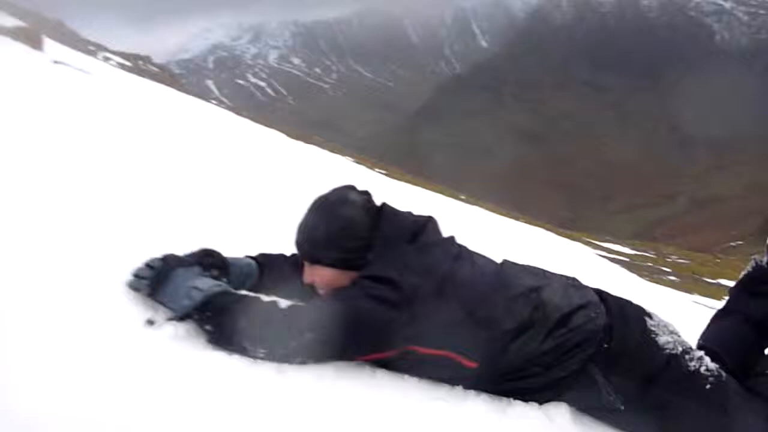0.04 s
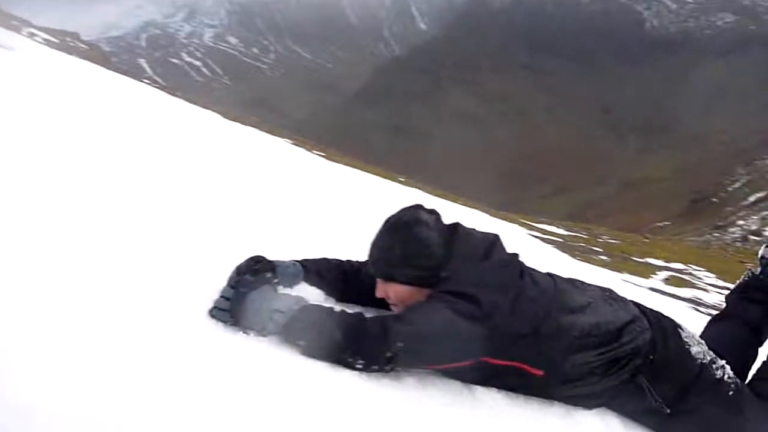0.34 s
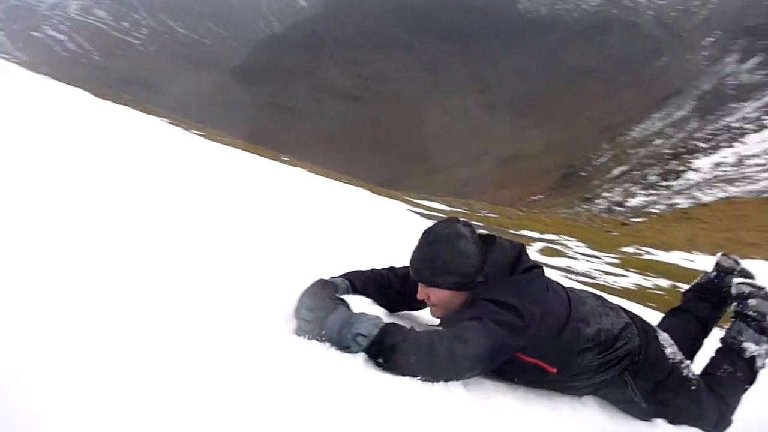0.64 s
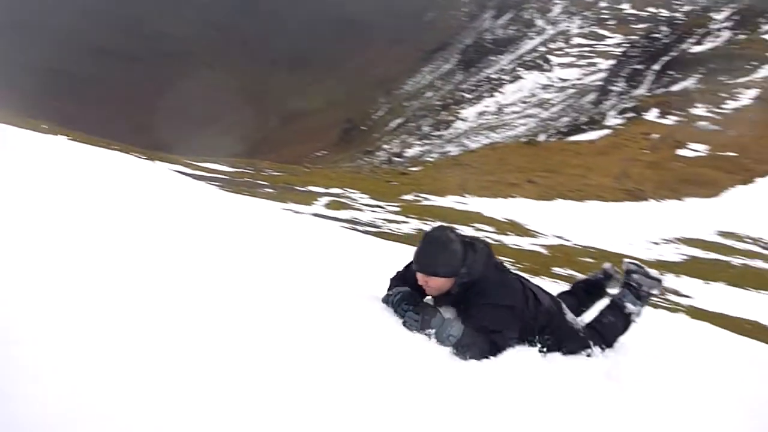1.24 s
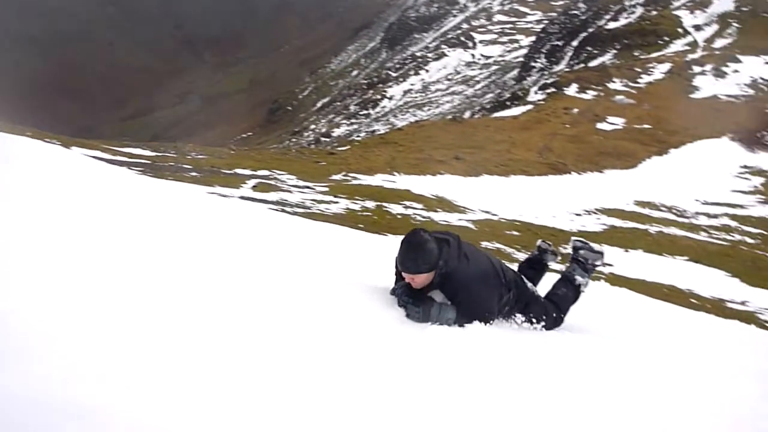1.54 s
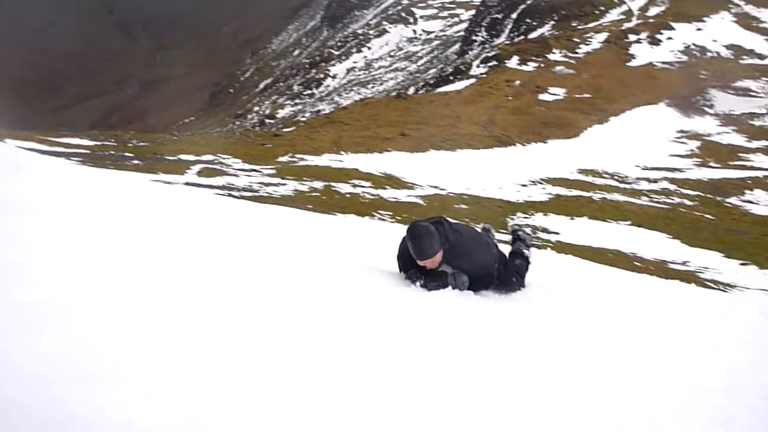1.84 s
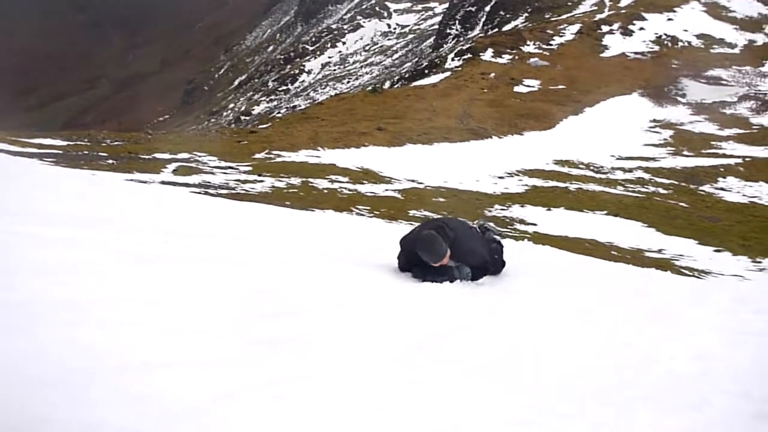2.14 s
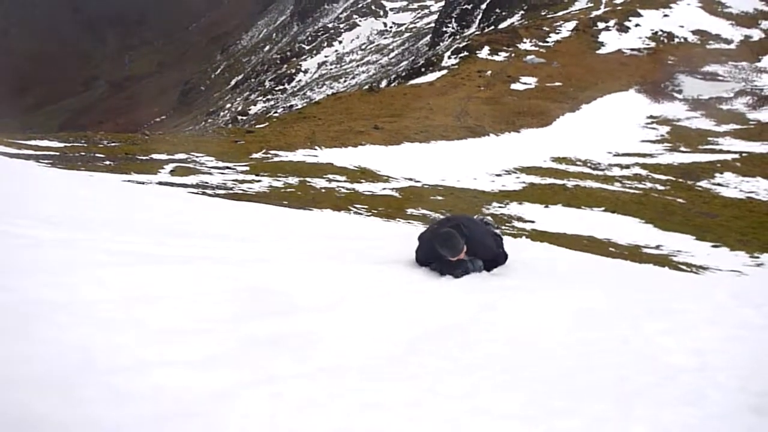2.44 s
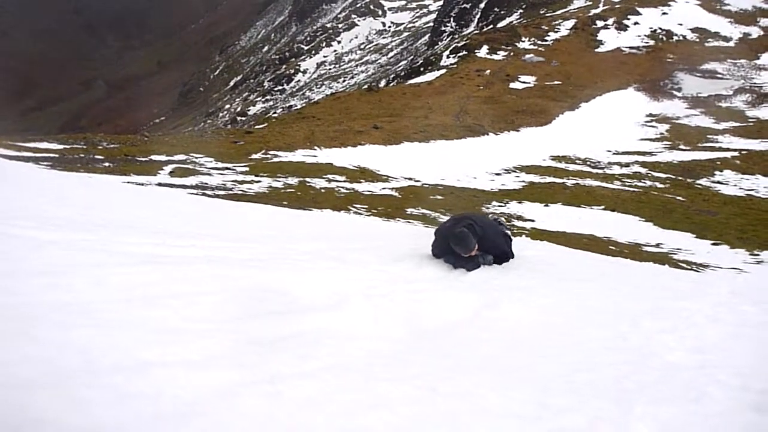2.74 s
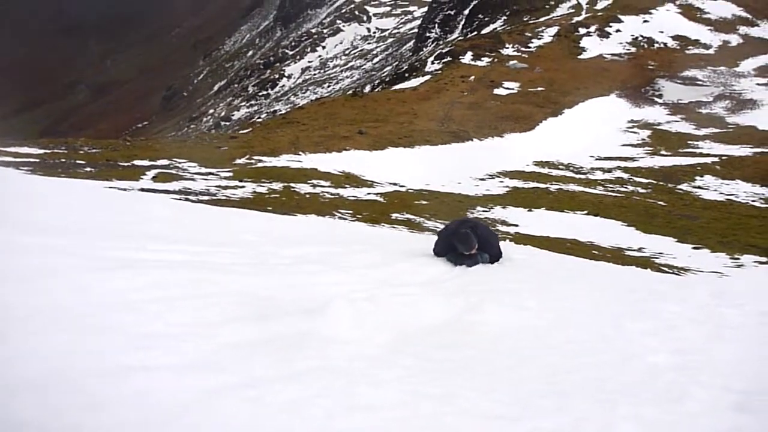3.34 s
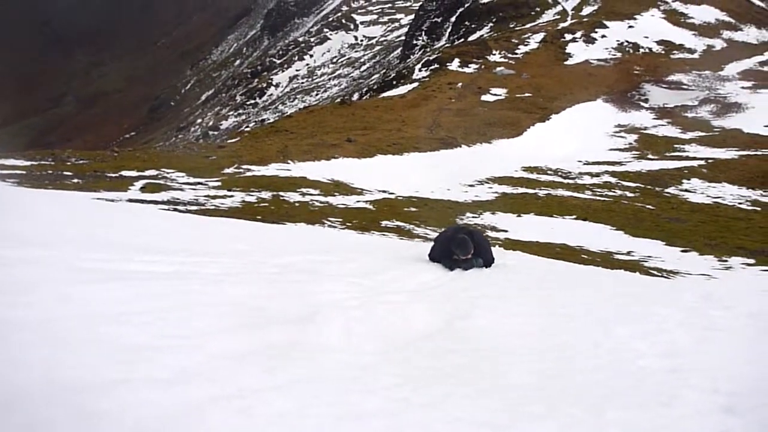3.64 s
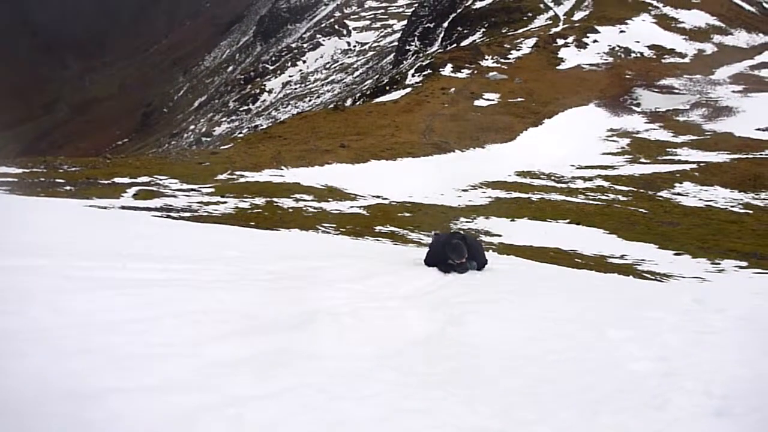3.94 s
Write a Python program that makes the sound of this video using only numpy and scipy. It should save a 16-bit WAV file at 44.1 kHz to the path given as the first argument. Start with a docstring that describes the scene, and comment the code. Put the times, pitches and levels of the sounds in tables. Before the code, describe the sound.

A body slides and scrapes over wet snow, fading away into steady mountain wind.

```python
"""A person slides belly-down over wet snow, passing close by and away downhill.
Sliding friction makes broadband noise: the body rubs, the jacket scrapes and swishes, and crystals
hiss on the cloth and fracture in tiny clicks. As the slide recedes, an even rush of mountain wind
remains. Near the end a camera's lens motor whines faintly. The small microphone is mono, with weak treble."""
import sys
import numpy as np
from scipy import signal
from scipy.fft import rfft, irfft
from scipy.io import wavfile
from scipy.ndimage import uniform_filter1d

SR = 44100
rng = np.random.default_rng(int(sys.argv[2]) if len(sys.argv) > 2 else 0)


def inscribe(sig):
    """Save sig as 16-bit PCM at rate SR to the path in sys.argv[1].

    A 1-D sig is mono; a 2-D sig holds one channel per row.
    Samples are clipped to [-1, 1] before scaling.
    """
    pcm = np.round(np.clip(np.atleast_2d(sig).T, -1, 1) * 32767)
    wavfile.write(sys.argv[1], SR, pcm.astype(np.int16))


N = 176400
T = np.arange(N) / SR
HZ = np.fft.rfftfreq(N, 1 / SR)

# Course of the slide: time_s, rub_db, scrape_db, hiss_db
SLIDE_LEVELS = [(.14, -45.5, -43, -46.5), (.3, -45, -42, -46.5), (.55, -45, -39.5, -43),
                (.8, -46.5, -41, -42), (.93, -44.5, -40, -41.5), (1.03, -48, -42, -42),
                (1.29, -43.5, -41, -43.5), (1.35, -47, -46, -45), (1.395, -50, -45, -49),
                (1.52, -55, -47, -50), (1.67, -50.7, -51, -48), (1.87, -59, -51, -53),
                (2.13, -55, -54.5, -54.5), (2.21, -56, -55, -56), (2.26, -70, -58, -57),
                (2.7, -66, -57.5, -57.5), (3.3, -61, -67, -58.5), (3.8, -76, -80, -66),
                (4.0, -70, -64, -71)]
# Body weight rubbing over packed snow: frequency_hz, level_db
RUB_SPECTRUM = [(40, -49), (110, -31), (180, -25.5), (280, -8.5), (480, -7), (700, -3.5), (900, 1),
                (1150, -4.5), (1450, -2.5), (2200, -11.5), (5000, -45)]
# Jacket ploughing the snow: frequency_hz, level_db
SCRAPE_SPECTRUM = [(200, -41), (1100, -24), (1450, -8), (1800, -6.5), (2130, -3), (2450, -3.5), (2950, -2),
                   (3220, -3), (3600, -1.5), (4200, -9.5), (6000, -10.5), (9000, -30), (15000, -29)]
# Crystals brushing the cloth: frequency_hz, level_db
HISS_SPECTRUM = [(100, -43), (1500, -18), (3500, -3), (4400, -1), (5150, 2), (5850, -3.5), (6400, -3.5),
                 (6950, -5), (8900, -13.5), (10300, -6.5), (11500, -12.5), (12800, -8), (13600, -10),
                 (15000, -30)]
# Wind over the valley: frequency_hz, level_db
WIND_SPECTRUM = [(25, -29), (60, -29.5), (100, -23), (180, -10), (280, -2), (430, 1.25), (620, 2),
                 (880, -1), (1300, -3), (1950, -7), (3200, -10), (3900, -13), (5300, -12.5), (6900, -19),
                 (9000, -17), (14000, -25.5)]
# Cloth dragging and catching: middle_s, half_length_s, centre_hz, half_width_hz, level_db
CLOTH_CATCHES = [(.55, 0.031, 3600, 170, -43.5), (0.657, 0.36, 2940, 130, -47.5),
                 (.6, 0.25, 6360, 230, -53.5), (0.886, 0.044, 5040, 250, -47),
                 (1.33, 0.024, 3470, 110, -47), (1.476, 0.044, 3990, 190, -47.3),
                 (1.56, 0.09, 3600, 320, -53), (2.208, 0.015, 4900, 900, -54),
                 (3.083, .025, 5550, 1100, -58), (3.347, 0.02, 5130, 1500, -53)]
# Moves of the lens motor: start_s, end_s, pitch_hz, step_rate_hz, level_db
MOTOR_MOVES = [(3.278, 3.432, 11859, 218, -61), (3.442, 3.605, 11789, 183, -62),
               (3.612, 3.793, 11789, 183, -62)]
# Resonances of the lens barrel: frequency_hz, gain_db
BARREL_RESPONSE = [(8500, -60), (9590, -20), (9680, -1), (9770, -16), (11200, -20), (11800, 1), (12100, -6),
                   (12400, -5), (12900, -20), (13550, -13), (13930, -3), (14300, -25)]
# Response of the small microphone: frequency_hz, gain_db
MIC_RESPONSE = [(6800, 0), (7400, -5.5), (7780, -16.5), (7950, -30), (8130, -15), (8500, -10.5), (9300, -9),
                (10300, -7.5), (11200, -6), (12200, -3.5), (13700, -4.5), (14600, -10), (15400, -8)]


def amp(db):
    """Amplitude grows tenfold for every 20 dB."""
    return 10 ** (np.asarray(db) / 20)


def unit(x):
    """Normalisation to an rms of 1."""
    return x / np.sqrt(np.mean(x ** 2) + 1e-20)


def colour(x, response):
    """Linear filtering: the spectrum is multiplied by a response interpolated over log frequency."""
    hz, db = np.transpose(response)
    gain = amp(np.interp(np.log(HZ + 1), np.log(hz), db))
    return irfft(rfft(x) * gain, N)


def wander(rate_hz):
    """Low-pass filtered noise gives a slow random fluctuation of rms 1."""
    low_pass = np.exp(-(HZ / rate_hz) ** 2) * (HZ > 0)
    return unit(irfft(rfft(rng.standard_normal(N)) * low_pass, N))


def patchy_noise(patch_db, bins=8, frames=22):
    """Random modulation makes the level of white noise drift in patches of frequency and time."""
    spectra = signal.stft(rng.standard_normal(N), nperseg=1024, noverlap=768)[2]
    patches = uniform_filter1d(rng.standard_normal(spectra.shape), bins, axis=0)
    patches = unit(uniform_filter1d(patches, frames, axis=1))
    return unit(signal.istft(spectra * amp(patch_db * patches), nperseg=1024, noverlap=768)[1][:N])


def noise_burst(middle_s, half_length_s, centre_hz, half_width_hz, level_db):
    """Gaussian windows confine noise in both frequency and time."""
    band = np.exp(-.5 * ((HZ - centre_hz) / half_width_hz) ** 2)
    envelope = np.exp(-.5 * ((T - middle_s) / half_length_s) ** 2)
    return unit(irfft(rfft(rng.standard_normal(N)) * band, N)) * amp(level_db) * envelope


def friction(spectrum, click_share, patch_db, clicks_per_s=3500):
    """Friction gives continuous noise; brittle fracture of crystals adds impulses, a few of them large."""
    size_db = 2 * np.minimum(rng.exponential(1, N), 5.7)
    polarity = np.sign(rng.standard_normal(N))
    clicks = unit(amp(size_db) * polarity * (rng.random(N) < clicks_per_s / SR))
    contact = np.sqrt(click_share) * clicks + np.sqrt(1 - click_share) * patchy_noise(patch_db)
    return unit(colour(contact, spectrum))


def slide(judder_db=0.44, judder_hz=35):
    """Sliding friction in three bands, amplitude-modulated together by small bumps in the snow."""
    time_s, rub_db, scrape_db, hiss_db = np.transpose(SLIDE_LEVELS)
    rub = friction(RUB_SPECTRUM, click_share=0.26, patch_db=0.25)
    rub *= amp(np.interp(T, time_s, rub_db))
    scrape = friction(SCRAPE_SPECTRUM, click_share=0.46, patch_db=0.05)
    scrape *= amp(np.interp(T, time_s, scrape_db))
    hiss = friction(HISS_SPECTRUM, click_share=0.36, patch_db=1.5)
    hiss *= amp(np.interp(T, time_s, hiss_db))
    return (rub + scrape + hiss) * amp(judder_db * wander(judder_hz))


def wind(level_db=-47, swell_db=0.38, swell_hz=5):
    """Turbulence in distant air makes an even broadband rush with slight swells."""
    rush = unit(colour(rng.standard_normal(N), WIND_SPECTRUM))
    return rush * amp(level_db + swell_db * wander(swell_hz))


def body_bump():
    """A soft impact, here the body on snow, holds its energy at low frequencies."""
    return noise_burst(middle_s=0.17, half_length_s=0.023, centre_hz=140, half_width_hz=35, level_db=-64)


def cloth_swishes():
    """Friction swells and fades as the cloth catches, each time in its own band."""
    return sum(noise_burst(*catch) for catch in CLOTH_CATCHES)


def lens_motor(ramp_s=0.0063, waver_hz=5, waver_rate_hz=30, fuzz_share=.15, sidebands=12):
    """A whine with sidebands spaced by the step rate, plus gear noise, drives the barrel's resonances."""
    moves = np.zeros(N)
    for start_s, end_s, pitch_hz, step_rate_hz, level_db in MOTOR_MOVES:
        cycles = np.cumsum(pitch_hz + waver_hz * wander(waver_rate_hz)) / SR
        tones = sum(np.cos(2 * np.pi * (cycles + k * step_rate_hz * T + rng.random()))
                    for k in range(-sidebands, sidebands + 1))
        whine = np.sqrt(1 - fuzz_share) * unit(colour(tones, BARREL_RESPONSE))
        gear_fuzz = np.sqrt(fuzz_share) * unit(colour(rng.standard_normal(N), BARREL_RESPONSE))
        envelope = np.clip(np.minimum(T - start_s, end_s - T) / ramp_s, 0, 1)
        moves += (whine + gear_fuzz) * amp(level_db) * envelope
    return moves


def scene():
    """Superposition: the sources add to one signal, alike in both channels."""
    mono = slide() + wind() + body_bump() + cloth_swishes() + lens_motor()
    return np.array([mono, mono])


def record(dry, start_s=.141, cutoff_hz=15700):
    """The microphone's frequency response colours the sound, which cuts in abruptly and is band-limited."""
    heard = np.array([colour(channel, MIC_RESPONSE) for channel in dry]) * (T >= start_s)
    low_pass = signal.firwin(511, cutoff_hz, window=("kaiser", 9), fs=SR)
    return signal.oaconvolve(heard, low_pass[None], "same")


dry = scene()
out = record(dry)
inscribe(out)
```